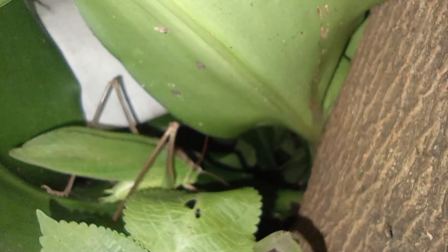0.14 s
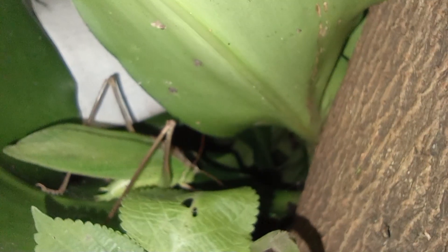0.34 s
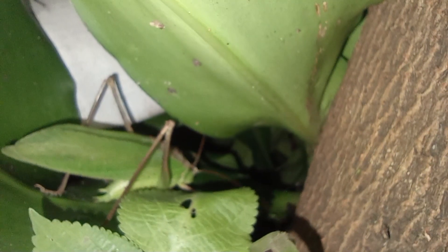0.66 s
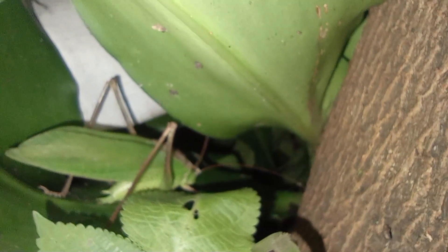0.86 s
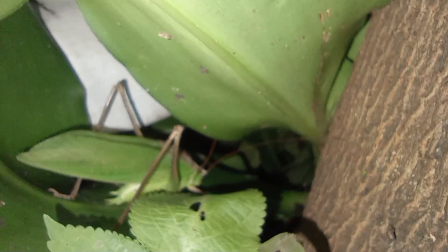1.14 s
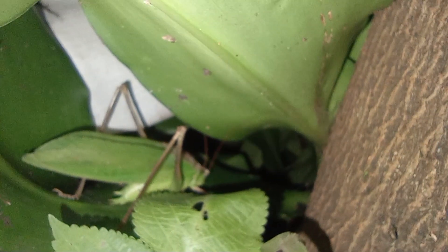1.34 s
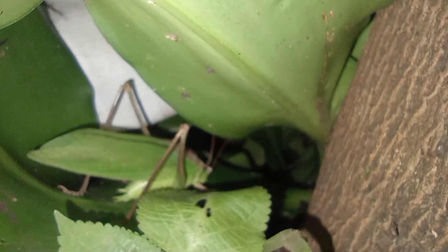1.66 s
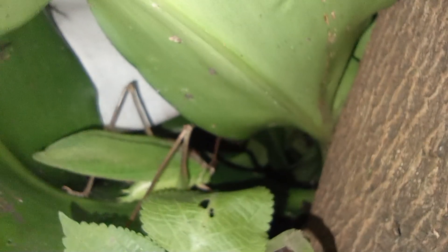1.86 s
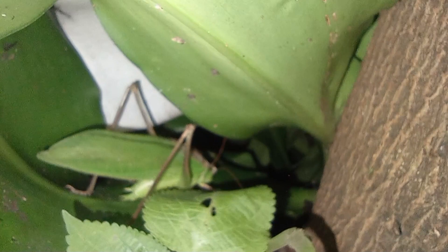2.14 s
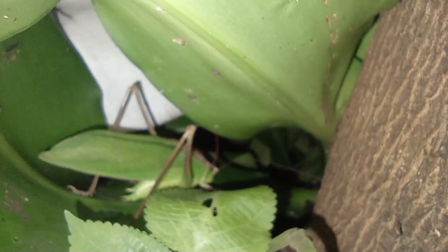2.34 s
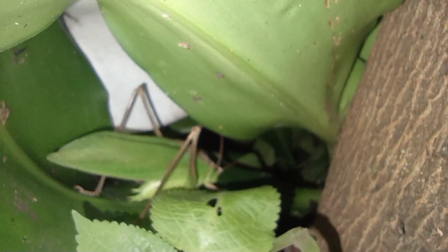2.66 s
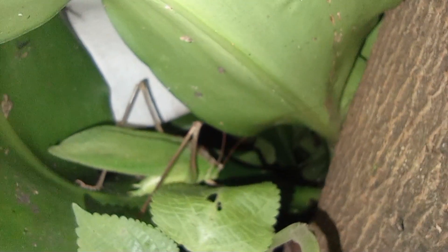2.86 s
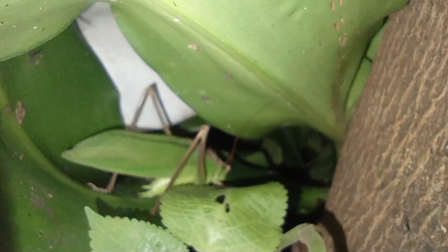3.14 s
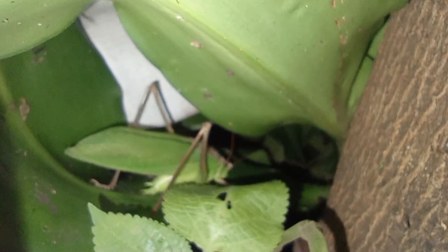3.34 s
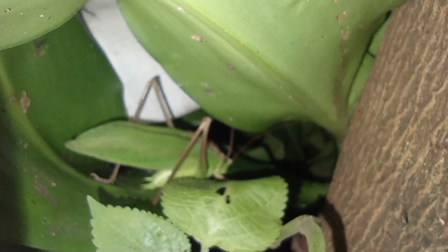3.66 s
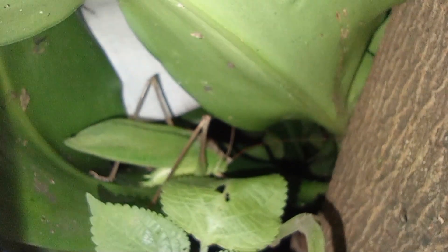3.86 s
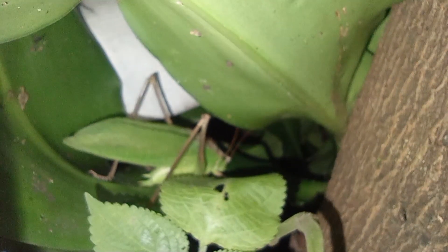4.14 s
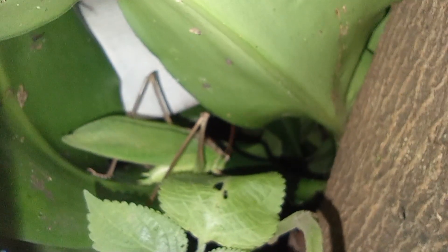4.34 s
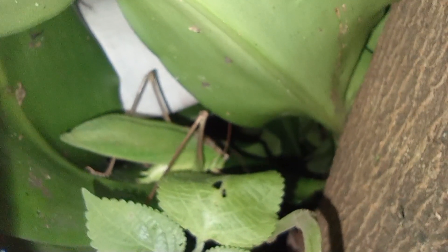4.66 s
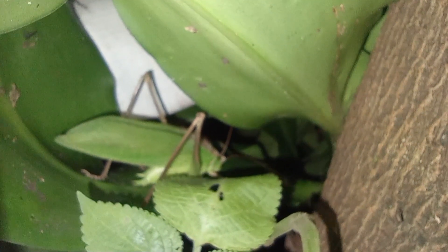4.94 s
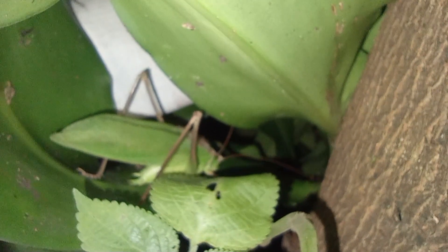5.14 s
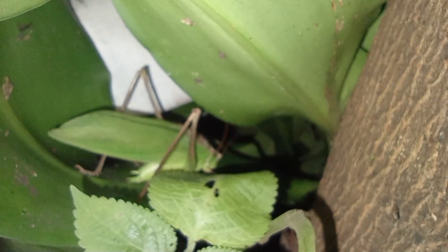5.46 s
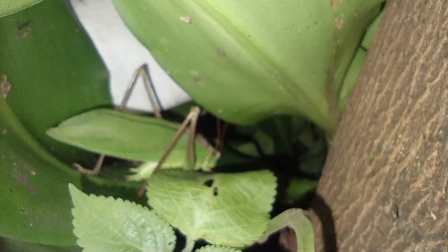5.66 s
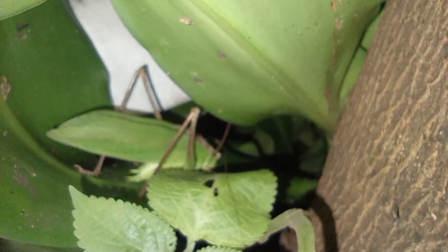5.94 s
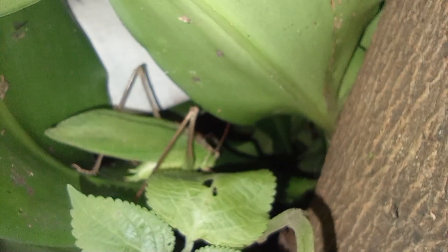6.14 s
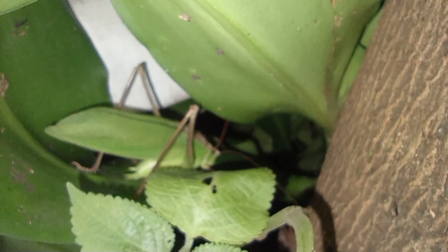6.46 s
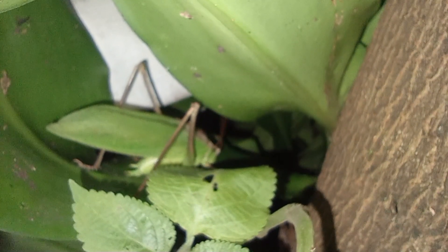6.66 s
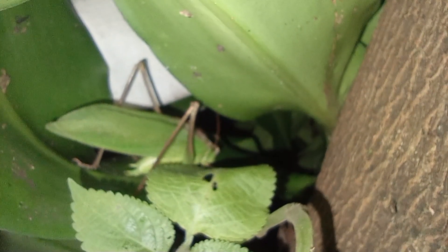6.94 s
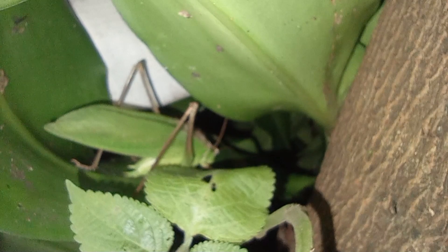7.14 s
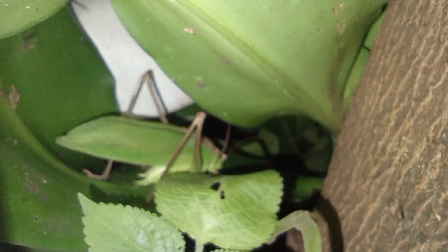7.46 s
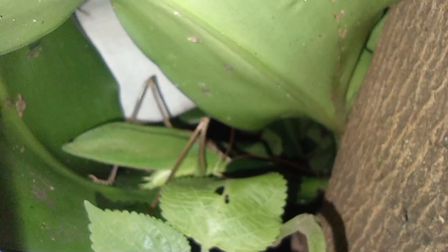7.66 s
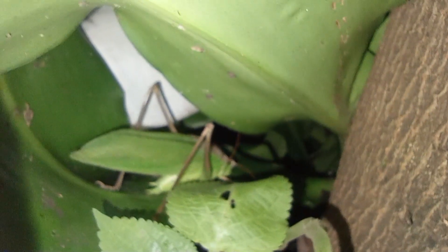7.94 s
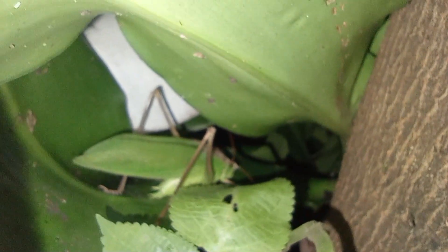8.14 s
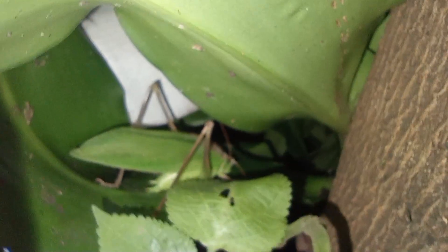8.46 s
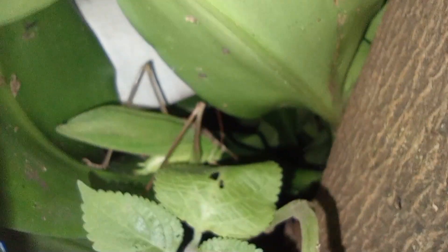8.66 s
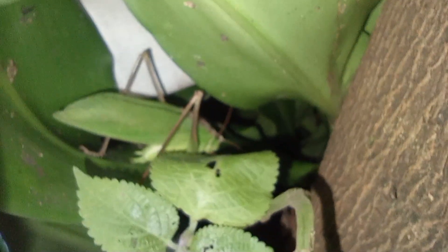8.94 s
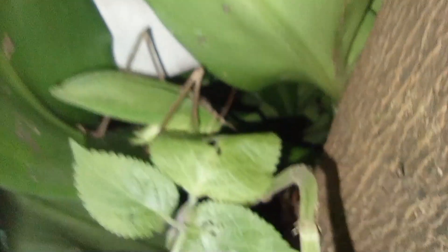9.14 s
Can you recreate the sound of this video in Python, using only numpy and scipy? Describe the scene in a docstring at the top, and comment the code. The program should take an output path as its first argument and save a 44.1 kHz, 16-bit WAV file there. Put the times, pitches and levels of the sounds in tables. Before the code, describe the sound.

A katydid very close by buzzes without pause, a fast rasping pulse with a piercing high ringing tone, dry clicks and low flutter beneath.

```python
"""A katydid buzzes on a leaf, very near two microphone ports, its wing beat slowing from 23 to 22 a second.
In each beat a scraper runs over a file: chirps around 6 to 8 kHz ring the wings, with hiss and dry clicks.
Each beat also jolts the air and makes a low flutter, both mostly at the left port.
Leaves answer briefly, a faint tone rises once far off, and the night murmurs low, around 400 Hz."""
import sys
import numpy as np
from scipy import signal
from scipy.fft import rfft, irfft, next_fast_len
from scipy.io import wavfile
from scipy.ndimage import map_coordinates

SR = 44100
rng = np.random.default_rng(int(sys.argv[2]) if len(sys.argv) > 2 else 0)


def bounce(signal):
    """Save signal as a 16-bit WAV file at the path given by the first command-line argument."""
    frames = np.transpose(np.atleast_2d(signal))
    limited = np.clip(frames, -1, 1)
    pcm = np.round(limited * 32767).astype(np.int16)
    wavfile.write(sys.argv[1], SR, pcm)


N = 410130


def amp(db):
    """Decibels to gain."""
    return 10 ** (np.asarray(db) / 20)


def unit(x):
    """Scale to rms 1."""
    return x / np.sqrt(np.mean(x ** 2) + 1e-20)


def curves(rows):
    """One value per sample for each column after the time."""
    s, *cols = np.transpose(rows)
    return [np.interp(np.arange(N) / SR, s, c) for c in cols]


def swings(rows):
    """A level curve in dB about its own mean, so only its rises and falls count."""
    db, = curves(rows)
    return db - db.mean()


def wobble(rate):
    """A smooth random curve, rate knots a second."""
    return map_coordinates(rng.standard_normal(int(N * rate / SR) + 4), [np.arange(N) * rate / SR])


def filtered(x, response):
    """x times a complex response of frequency."""
    size = next_fast_len(N + 8192)
    return irfft(rfft(x, size) * response(np.fft.rfftfreq(size, 1 / SR)), size)[..., :N]


def coloured(x, spectrum):
    """x shaped by (Hz, dB) points, at rms 1."""
    points_hz, db = np.transpose(spectrum)
    return unit(filtered(x, lambda hz: amp(np.interp(np.log(hz + 1), np.log(points_hz), db))))


def noise(spectrum):
    """Coloured noise of rms 1."""
    return coloured(rng.standard_normal(N), spectrum)


def ring(x, modes, direct=0):
    """x through a bank of resonances plus a direct share, at rms 1."""
    def body(f):
        """Each mode passes its own pitch best, in a band of its own width."""
        return direct + sum(amp(db) * 1j * f * width / (centre ** 2 - f * f + 1j * f * width)
                            for centre, width, db in modes)
    return unit(filtered(x, body))


def per_beat(beats):
    """A new random value for each wing beat, changing a quarter beat before the count turns over."""
    return rng.standard_normal(N // 1000)[np.floor(beats + .25).astype(int) + 1]


def swell(beats, place, length):
    """A smooth bump once a beat."""
    return np.exp(-.5 * (((beats - place + .5) % 1 - .5) / length) ** 2)


# How fast the wings beat. Each row: time in seconds, wing beats a second.
WING_PACE = [(0, 23.302), (1.2, 23.244), (4.3, 22.754), (7.5, 22.401), (8.2, 22.124), (9.3, 21.905)]


def wing_cycle(start=-.632, stumble=.009):
    """The running count of wing beats, slightly unsteady (start and stumble in beats)."""
    return start + np.cumsum(curves(WING_PACE)[0]) / SR + stumble * wobble(10)


# Pushes of the wings in every beat. Each row: place and length as shares of the beat,
# strength on the air in dB, strength on the file in dB.
WING_PUSHES = [(.135, .065, 0, -.5), (.265, .058, -3.5, -3), (.43, .055, -3, -4), (.515, .03, -4, -6),
               (.83, .04, -14, -9), (.96, .04, -11, -7)]
LULL_DB = -24  # force between pushes


def pushes(beats):
    """Force on the air and on the file in dB: hard pushes early in the beat, light ones later."""
    power = amp(LULL_DB) ** 2
    for place, length, air_db, file_db in WING_PUSHES:
        power = power + (amp([[air_db], [file_db]]) * swell(beats, place, length)) ** 2
    return 10 * np.log10(power)


# Runs of the scraper over the file in every beat. Each row: start and end as shares of the beat,
# first and last tooth rate in Hz, left and right level in relative dB.
SCRAPER_RUNS = [(.01, .14, 5850, 6250, -5, -14), (.1, .22, 6350, 6900, -11, -6),
                (.21, .36, 7020, 7480, -7, 0), (.33, .47, 7900, 7250, -16, -5),
                (.35, .41, 6700, 5900, -8, -14), (.385, .47, 5550, 5800, -6, -7),
                (.435, .51, 5850, 6600, -5, -12), (.46, .55, 6480, 6680, -9, -1),
                (.48, .63, 6720, 6860, -1, -4), (.62, .73, 6650, 5950, -6, -16),
                (.77, .89, 6100, 5950, -7, -18), (.9, 1.04, 6400, 6830, -5.5, -5)]
# Wing resonances as they radiate to each port. Each row: pitch in Hz, width in Hz, relative dB.
WING_LEFT = [(5570, 130, -5), (5850, 220, -3), (6120, 280, -1), (6780, 140, 2), (7200, 180, -4),
             (7460, 180, -4), (7830, 250, -4)]
WING_RIGHT = [(5570, 150, -5), (6540, 110, 0), (6800, 130, 1.5), (7220, 130, 0), (7450, 120, 0),
              (7800, 240, 0)]
# A wing mode that faces the ports at first, then fades. Each row: pitch in Hz, width in Hz, relative dB.
EARLY_MODE = [(7190, 170, 0)]
# How loud the tooth tone is. Each row: time in seconds, left port in dB, right port in dB.
SONG_LEVEL = [(0, -30.5, -30), (1.1, -23, -27.5), (2.6, -23, -23), (3.9, -21, -20.5), (5.2, -24, -21),
              (7.5, -25.5, -20.5), (8.3, -19.5, -19), (9.3, -25.5, -20.5)]
EARLY_DB, EARLY_FADE_S = -3, 2.0
RUN_EASE = 1.7  # how soon a run levels off in pitch
# scatter from beat to beat: pitch as a share, strength in dB, place as a share of the beat
RUN_PITCH, RUN_DB, RUN_SHIFT = .007, 1.1, .006
# tooth rate that reaches both ports in step; how fast the phase between them turns with pitch, in seconds
IN_PHASE_HZ, PORT_LAG_S = 6450, .0004
# share of the chirps heard without wing resonance; ring-up time as a share of the beat
WING_DIRECT, RING_UP = .2, .025


def song(beats):
    """The scraper crosses the file in short chirps at the tooth rate, which ring the wings."""
    chirps = np.zeros((2, N))
    for start, end, first_hz, last_hz, left_db, right_db in SCRAPER_RUNS:
        own = beats + RING_UP - start  # runs start early to let the wings ring up
        place = (own + .22) % 1 - .25 + RUN_SHIFT * per_beat(own)
        u = np.clip(place / (end - start), 0, 1)  # progress through the run
        rate = last_hz + (first_hz - last_hz) * (1 - u) ** RUN_EASE
        rate = rate * (1 + RUN_PITCH * per_beat(own))
        strength = np.sin(np.pi * u) * amp(RUN_DB * per_beat(own))
        phase = 2 * np.pi * np.cumsum(rate) / SR
        lag = 2 * np.pi * (rate - IN_PHASE_HZ) * PORT_LAG_S
        chirps += amp([[left_db], [right_db]]) * strength * np.sin([phase, phase - lag])
    early = amp(EARLY_DB) * np.exp(-np.arange(N) / SR / EARLY_FADE_S)
    ports = [ring(port, wing, WING_DIRECT) + early * ring(port, EARLY_MODE)
             for port, wing in zip(chirps, (WING_LEFT, WING_RIGHT))]
    return amp(curves(SONG_LEVEL)) * np.array(ports)


# How loud the steady ringing is. Each row: time in seconds, left port in dB, right port in dB.
RING_LEVEL = [(0, -23, -52), (1.1, -31, -34), (2.8, -31, -25.5), (9.3, -32.5, -24.5)]


def ringing():
    """Small skips of the scraper keep the wing resonances sounding between the runs."""
    skips = rng.standard_normal(N) * amp(2 * wobble(400))
    return amp(curves(RING_LEVEL)) * np.array([ring(skips, WING_LEFT), ring(skips, WING_RIGHT)])


# Upper wing modes that flare once a beat. Each row: pitch in Hz, width in Hz, place and length as
# shares of the beat, left and right level in relative dB, share of the beaming.
UPPER_FLARES = [(10120, 300, .06, .05, -1, -4, .7), (7850, 150, .06, .04, -2, 2, 0),
                (8850, 300, .16, .03, 0, 2, .2), (10950, 200, .13, .05, -4, -6, 1),
                (10050, 200, .29, .04, 1, -3, 1), (8800, 400, .365, .016, 2, 3, .3),
                (11080, 200, .425, .04, 5, 0, 1), (10110, 220, .84, .065, -1, -5, .8),
                (8750, 300, 1, .04, -3, -2, .2)]
# The highest modes beam narrowly. Each row: time in seconds, their level at the ports in relative dB.
BEAM = [(0, -6), (2.7, -6), (3.3, 1), (4.2, 1.5), (5.2, -1), (7.4, -1.5), (8, 2.5), (9.3, -0.5)]
FLARE_DB, FLARE_LAG = -27, 2.3  # level of all flares; lag at the right port in radians


def flares(beats):
    """Higher wing modes sing briefly at their own places along the file, wavering in pitch and level."""
    out, (beam_db,) = np.zeros((2, N)), curves(BEAM)
    for hz, width, place, length, left_db, right_db, beaming in UPPER_FLARES:
        phase = 2 * np.pi * np.cumsum(hz + width / 2 * wobble(700)) / SR
        level_db = beaming * beam_db + 2 * wobble(250) + 2 * wobble(14)
        level = amp(level_db) * swell(beats, place, length)
        out += level * amp([[left_db], [right_db]]) * np.sin([phase, phase - FLARE_LAG])
    return amp(FLARE_DB) * unit(out)


def nearby(x, count=7, first_s=.0012, last_s=.008, gain=.22):
    """The trunk and the closest leaves throw back weak copies that ripple the spectrum at each port."""
    copies = np.zeros((2, N))
    for pair in rng.uniform(first_s, last_s, (count, 2)):
        copies += np.array([np.roll(port, int(s * SR)) for port, s in zip(x, pair)])
    return (x + gain * copies) / np.sqrt(1 + count * gain ** 2)


# Colour of the hiss at each port. Each row: pitch in Hz, relative dB.
RASP_LEFT = [(300, -4), (1200, -12.5), (2200, -5), (5300, -2.5), (6200, 3.5), (7600, 2.5), (8100, -4),
             (9000, 1), (9400, -0.5), (12200, -2.5), (12700, -3), (15500, -11.5)]
RASP_RIGHT = [(300, -33), (1200, -17.5), (2200, -3), (5000, 1), (6200, 4.5), (7700, 7.5), (8250, 6),
              (8900, -1), (9400, 5), (10100, 3.5), (15500, -6)]
# Effort of the singer. Each row: time in seconds, effort in dB, of which only the swings count.
EFFORT = [(0.0, -21), (0.05, -19), (1.09, -14), (3.94, -11), (6.89, -12), (8.57, -10.5), (8.96, -13.5),
          (9.3, -8)]
RASP_DB, RASP_SWING = -19, .23  # the hiss follows the effort only a little
RASP_GRIP = .11  # dB of rasp for each dB of push on the file


def rasp(file_db, right_db=-1):
    """Broad friction hiss that runs through the whole beat."""
    grip = unit(amp(RASP_GRIP * file_db + .7 * wobble(1500) + .35 * wobble(16)))
    hiss = grip * np.array([noise(RASP_LEFT), amp(right_db) * noise(RASP_RIGHT)])
    return amp(RASP_DB + RASP_SWING * swings(EFFORT)) * nearby(hiss)


# Colour of the dry clicks. Each row: pitch in Hz, relative dB.
SCRAPE_COLOUR = [(300, -6), (900, 0), (1800, 0), (4500, -2), (7000, -10), (12000, -22)]
SCRAPE_DB = -28.5


def scrape(file_db, catches=2200, right_db=-5.0):
    """Single teeth catch at random (catches a second) with small dry clicks, stronger in the pushes."""
    clicks = (rng.random((2, N)) < catches / SR) * rng.standard_normal((2, N))
    return amp(SCRAPE_DB) * coloured(amp(file_db) * clicks, SCRAPE_COLOUR) * amp([[0], [right_db]])


# Colour of the moving air. Each row: pitch in Hz, relative dB.
FLUTTER_COLOUR = [(20, -31), (40, -38), (65, -13.5), (110, -2.5), (200, -1.5), (330, -4.5), (600, -10.5),
                  (1000, -19.5), (1500, -20.5), (2200, -26), (3500, -38.5)]
FLUTTER_DB = -22.5


def flutter(beats, air_db, right_db=-11.0):
    """Each beat stirs eddies that differ from port to port."""
    push = unit(amp(air_db + .5 * per_beat(beats) + 1.8 * wobble(400)))
    eddies = push * np.array([noise(FLUTTER_COLOUR), noise(FLUTTER_COLOUR)])
    return amp(FLUTTER_DB) * eddies * amp([[0], [right_db]])


# Jolts of the wings in every beat. Each row: place as a share of the beat, middle width in seconds,
# relative strength (push + or pull -).
WING_JOLTS = [(.125, .001, 1), (.22, .0019, -1), (.275, .0006, .3), (.465, .0014, -.6), (.55, .0018, .9)]
# How the jolts come and go. Each row: time in seconds, level in dB, of which only the swings count.
JOLT_LEVEL = [(0.0, -43), (0.07, -34), (0.15, -31.5), (0.33, -26.5), (0.39, -44), (0.62, -31),
              (1.55, -29.5), (1.6, -34), (1.68, -25), (1.76, -33), (1.94, -33), (1.99, -42), (2.1, -30),
              (2.33, -38), (2.38, -46), (2.41, -34), (3.16, -35.5), (7.38, -30), (7.41, -42.5), (8.26, -32),
              (9.12, -42.5), (9.3, -31)]
JOLT_DB, JOLT_RIGHT_DB = -28, -25.5  # overall level; right port against left


def jolts(beats, scatter=.008, uneven_db=5, drift_db=2, stretch=.3):
    """Pressure pulses, placed nearly alike in each beat; their strengths drift and their widths vary."""
    out = np.zeros(N)
    pace = np.gradient(beats) * SR  # beats a second
    for place, width, push in WING_JOLTS:
        away = (beats - place + scatter * per_beat(beats) + .5) % 1 - .5
        u = away / pace / (width * np.exp(stretch * per_beat(beats)))
        strength = push * amp(uneven_db * np.tanh(per_beat(beats)) + drift_db * wobble(2.023))
        out += strength * (1 - u * u) * np.exp(-.5 * u * u)
    return amp(JOLT_DB + swings(JOLT_LEVEL)) * unit(out) * amp([[0], [JOLT_RIGHT_DB]])


# How flutter and clicks come and go. Each row: time in seconds, level in dB, of which only the swings count.
AIR_LEVEL = [(0.0, -30.5), (0.13, -31), (0.18, -28), (0.31, -30), (0.33, -26.5), (0.54, -30.5), (0.67, -28),
             (2.51, -31.5), (2.54, -27.5), (3.16, -32), (3.29, -30.5), (5.26, -30.5), (5.52, -29.5),
             (8.73, -30.5), (8.81, -36), (8.83, -29), (8.88, -31.5), (9.12, -31), (9.14, -28),
             (9.17, -32.5), (9.27, -33), (9.3, -31)]
STROKE_SWING = .46  # share of the song's swings at the right port that the strokes follow there


def strokes(beats, air_db, file_db):
    """The clicks, flutter and jolts of each beat, partly following the song at the right port."""
    out = amp(swings(AIR_LEVEL)) * (scrape(file_db) + flutter(beats, air_db)) + jolts(beats)
    _, right_db = curves(SONG_LEVEL)
    out[1] *= amp(STROKE_SWING * (right_db - right_db.mean()))
    return out


def leaves(x, t60=.08, echo_db=-13):
    """A short diffuse answer from the foliage, falling 60 dB in t60 seconds."""
    t = np.arange(SR // 5) / SR
    tail = rng.standard_normal((2, len(t))) * amp(-60 * t / t60) * (t > .003)
    return amp(echo_db) * signal.fftconvolve(x, tail / np.linalg.norm(tail[0]), axes=1)[:, :N]


def far_tone(start=6.06, length=.24, first_hz=665, last_hz=705, db=-35.5):
    """A faint tone swells, fades and rises in pitch once in the distance (start and length in seconds)."""
    u = np.clip((np.arange(N) / SR - start) / length, 0, 1)
    phase = 2 * np.pi * np.cumsum(first_hz + (last_hz - first_hz) * u) / SR
    return amp(db) * np.sin(np.pi * u) * np.sin(phase)


# Colour of the night floor. Each row: pitch in Hz, relative dB.
NIGHT_COLOUR = [(20, -10), (60, -9), (120, -22), (400, 38), (1000, -42), (4000, -29), (15000, -40)]


def night(db=-47):
    """A faint steady murmur of noise, strongest around 400 Hz and separate at each port."""
    return amp(db) * np.array([noise(NIGHT_COLOUR), noise(NIGHT_COLOUR)])


def scene():
    """One wing cycle, slightly unsteady, drives the layers of the buzz over the night."""
    beats = wing_cycle()
    air_db, file_db = pushes(beats)
    tone = song(beats) + ringing()
    upper = flares(beats)
    buzz = tone + upper + rasp(file_db) + strokes(beats, air_db, file_db)
    return buzz + leaves(tone + upper) + far_tone() + night()


def record(dry, low_hz=52, overload=.9, top_hz=15600):
    """The recorder sheds the deepest bass, rounds off the hardest peaks and cuts all above its band limit."""
    x = filtered(dry, lambda hz: hz ** 3 / np.sqrt(hz ** 6 + low_hz ** 6))
    x = x / (1 + (x / overload) ** 6) ** (1 / 6)
    return filtered(x, lambda hz: hz < top_hz)


dry = scene()
out = record(dry)
bounce(out)
```